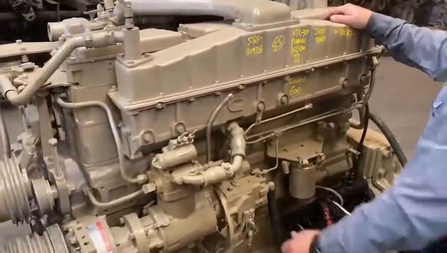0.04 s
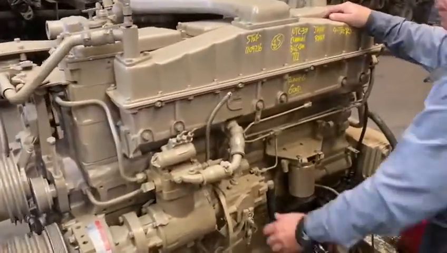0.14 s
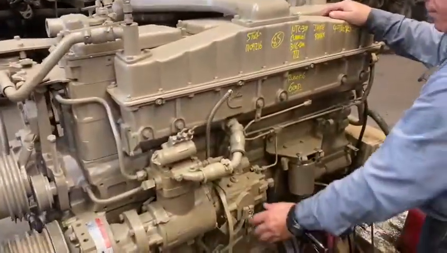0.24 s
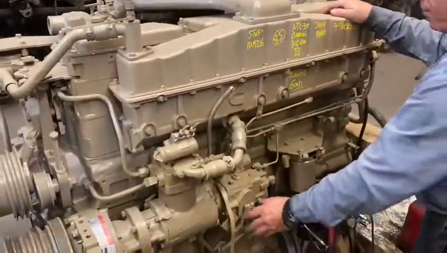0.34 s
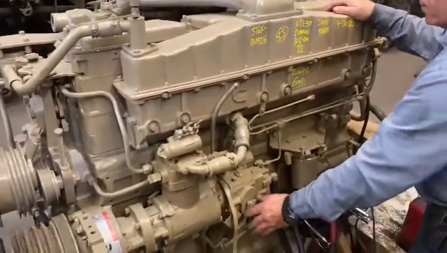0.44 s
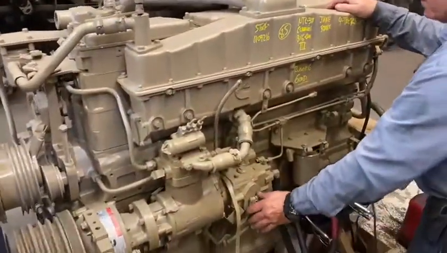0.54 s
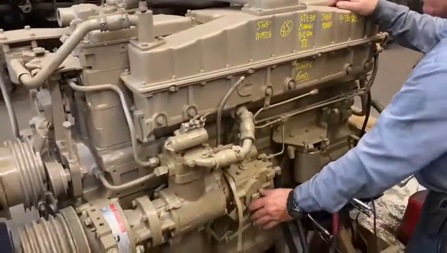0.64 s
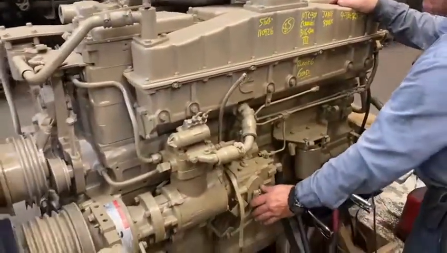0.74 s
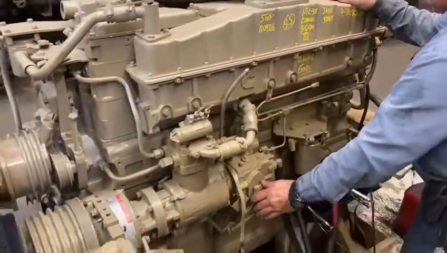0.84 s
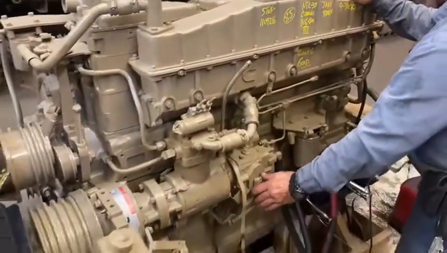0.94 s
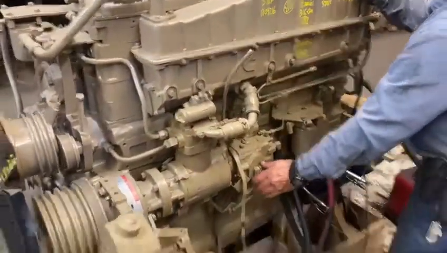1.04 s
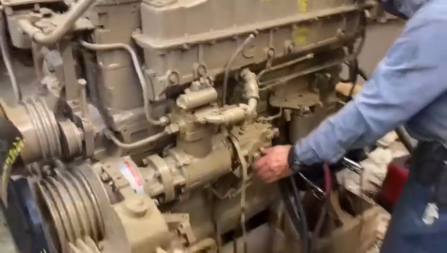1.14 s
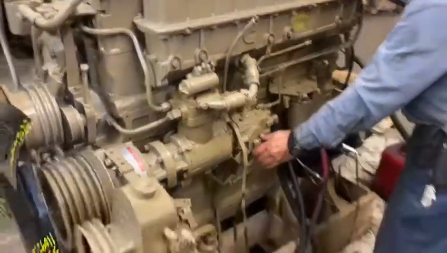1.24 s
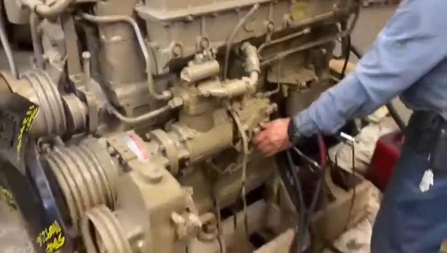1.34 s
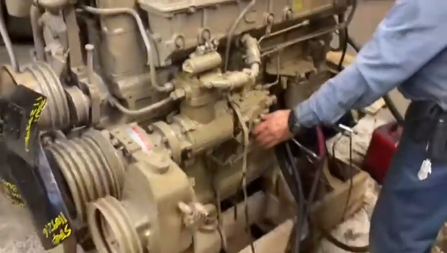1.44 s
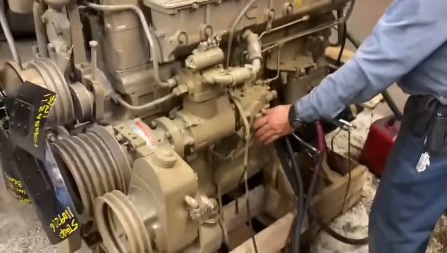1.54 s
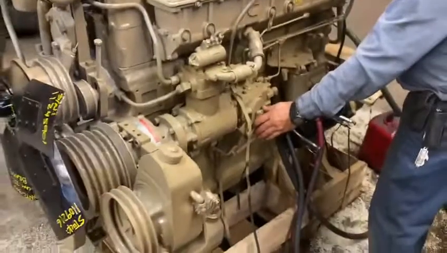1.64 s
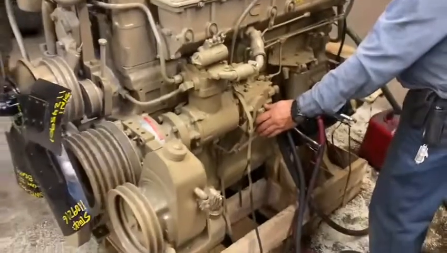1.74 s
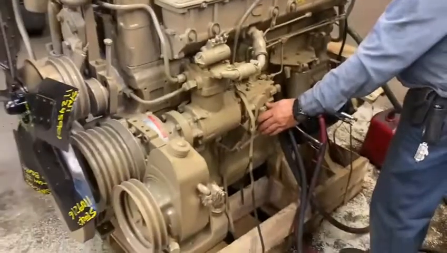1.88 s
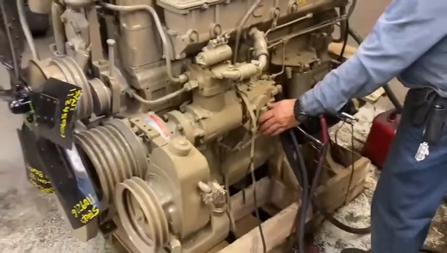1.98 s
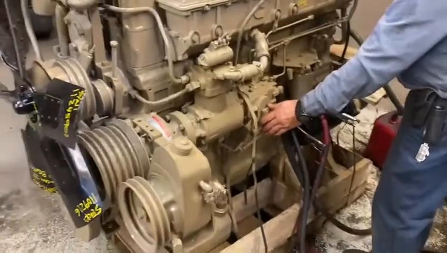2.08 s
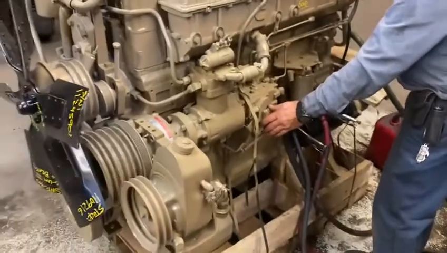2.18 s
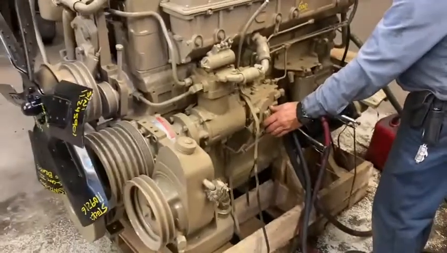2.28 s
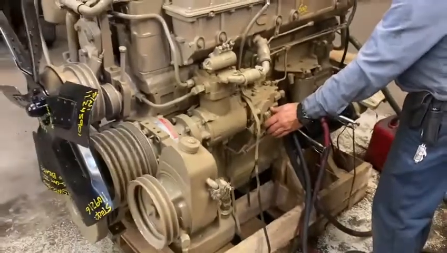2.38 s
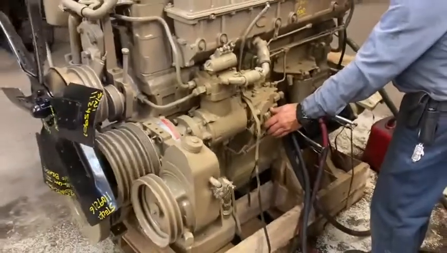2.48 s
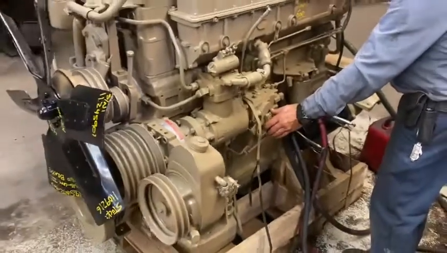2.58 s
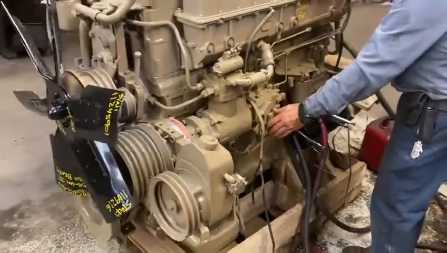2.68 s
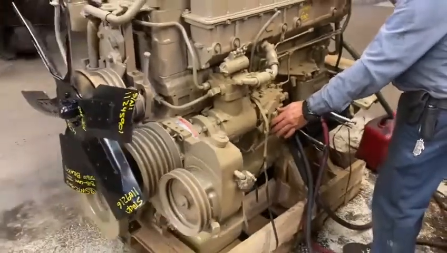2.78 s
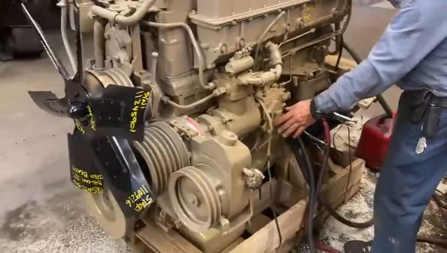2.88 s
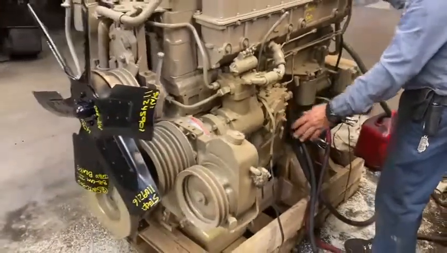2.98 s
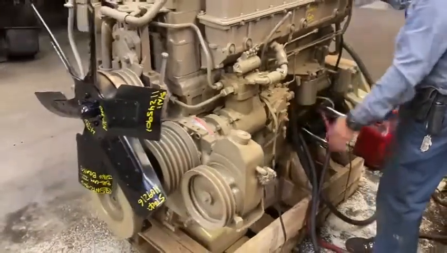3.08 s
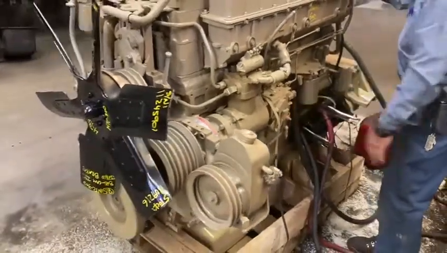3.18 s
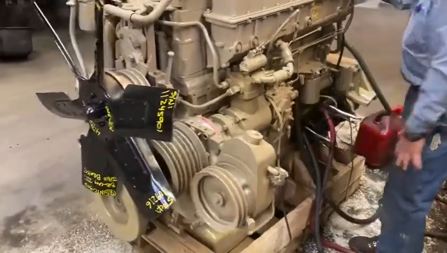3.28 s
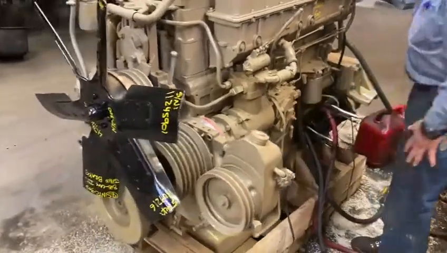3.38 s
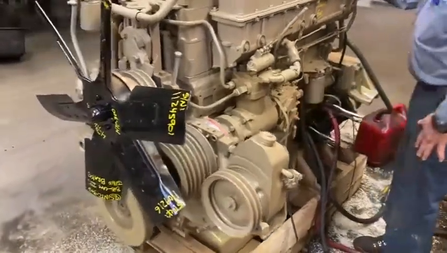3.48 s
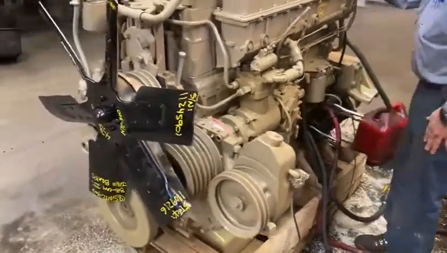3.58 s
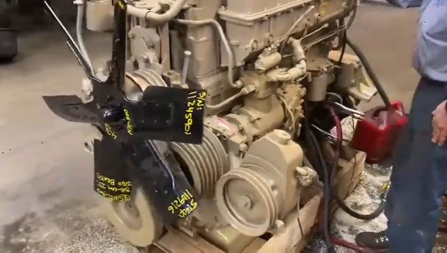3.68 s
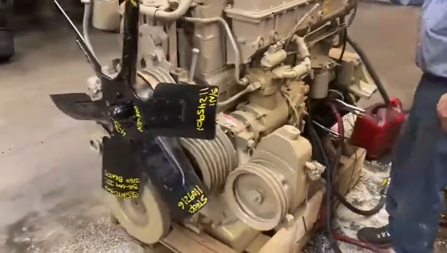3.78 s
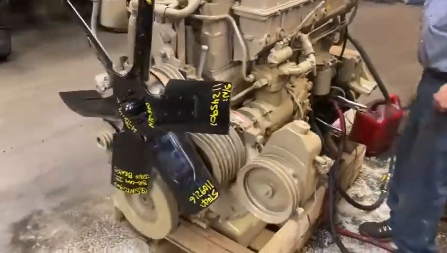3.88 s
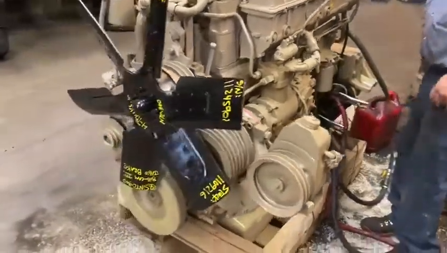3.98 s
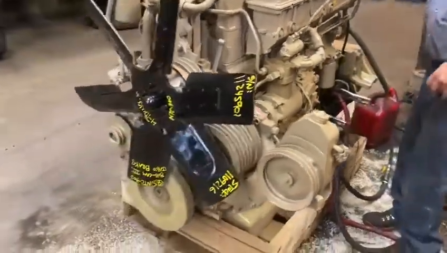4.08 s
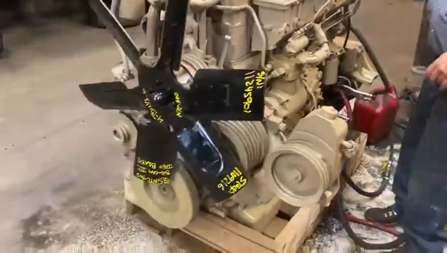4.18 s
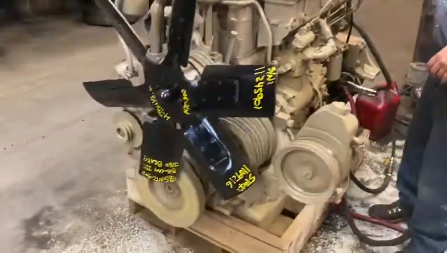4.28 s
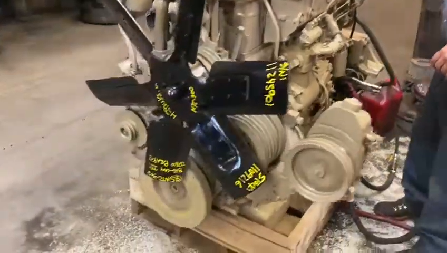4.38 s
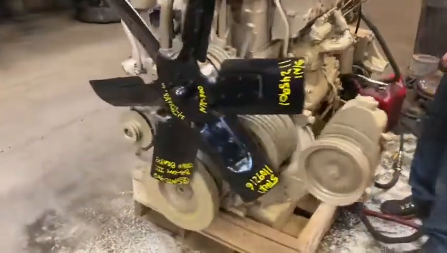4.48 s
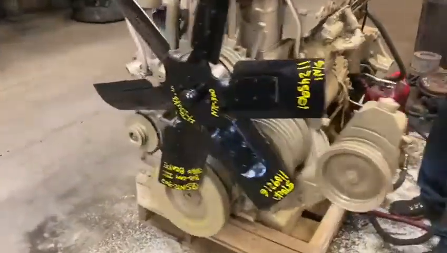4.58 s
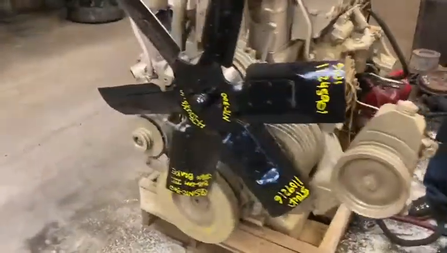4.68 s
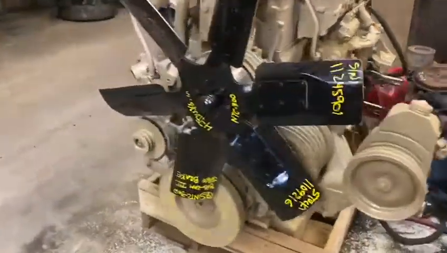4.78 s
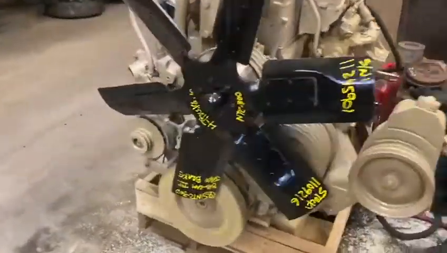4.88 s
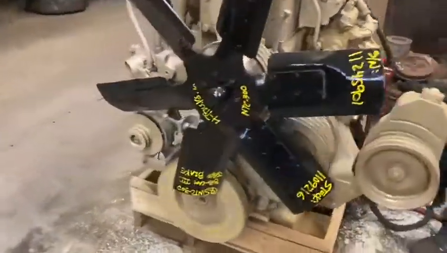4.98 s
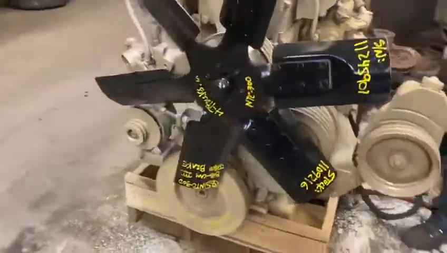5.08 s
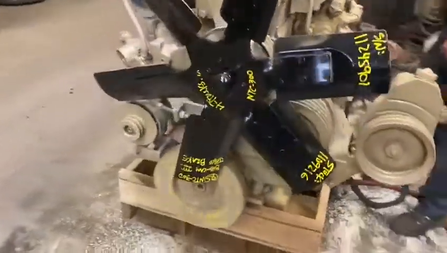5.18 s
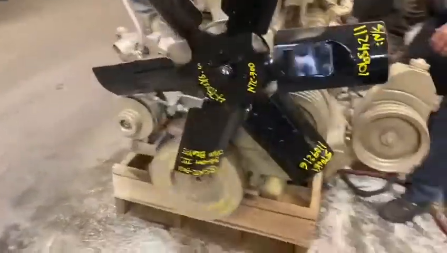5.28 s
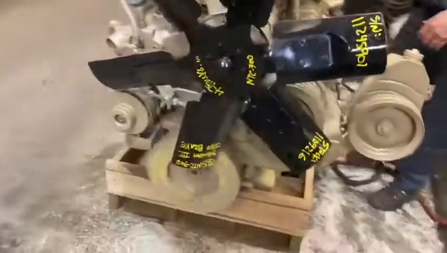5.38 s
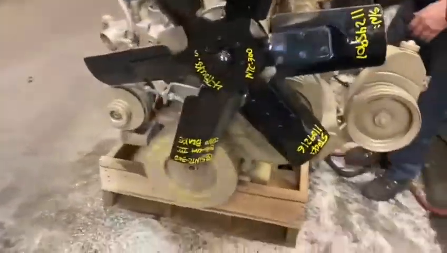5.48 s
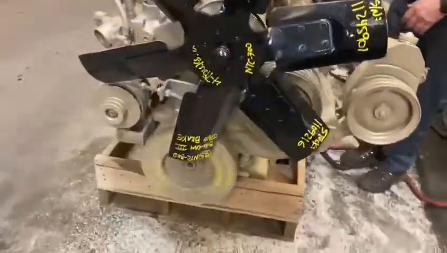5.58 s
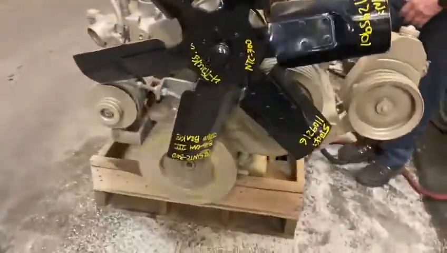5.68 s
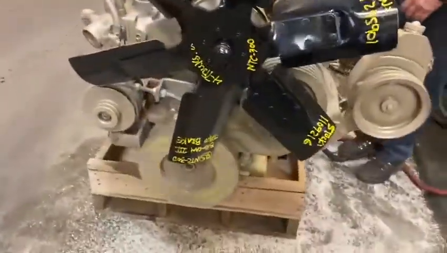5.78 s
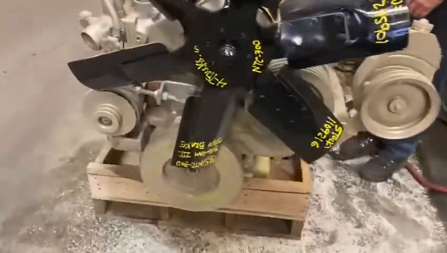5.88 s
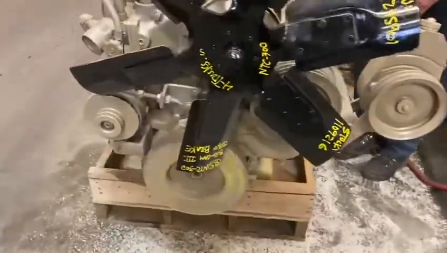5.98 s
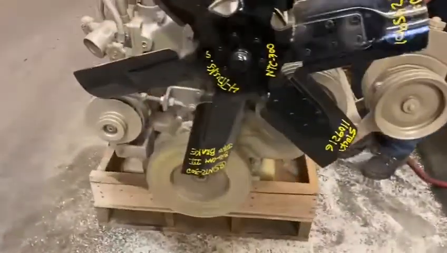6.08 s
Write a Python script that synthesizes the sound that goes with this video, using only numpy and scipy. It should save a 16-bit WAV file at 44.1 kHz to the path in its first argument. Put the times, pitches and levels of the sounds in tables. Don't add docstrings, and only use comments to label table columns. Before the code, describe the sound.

Large six-cylinder diesel clatters and puffs at idle, roars up in two blips as its turbo whistles, winds down nearly to stalling, then fires back up.

```python
import sys
import numpy as np
from scipy import signal
from scipy.fft import rfft, irfft, next_fast_len
from scipy.io import wavfile
from scipy.ndimage import uniform_filter1d, map_coordinates

SR = 44100
rng = np.random.default_rng(int(sys.argv[2]) if len(sys.argv) > 2 else 0)


def to_wav(s):
    ch = np.atleast_2d(s).T
    pcm = np.round(np.clip(ch, -1, 1) * 32767)
    wavfile.write(sys.argv[1], SR, pcm.astype(np.int16))


def linear_from_db(decibels):
    return 10 ** (np.asarray(decibels, float) / 20)


N = 270325
TIME_S = np.arange(N) / SR

# time_s, speed_turns_per_s
CRANK_SPEED = [(0.0, 11.16), (1.05, 11.19), (1.22, 12.06), (1.58, 17.57), (1.59, 19.76), (1.8, 20.56),
               (2.0, 20.46), (2.25, 19.87), (2.4, 21.0), (2.75, 27.49), (2.93, 29.06), (3.15, 28.36),
               (3.4, 26.09), (4.2, 17.97), (4.9, 11.88), (5.55, 7.27), (5.7, 7.91), (6.13, 13.74)]
# time_s, load_db, firing_pressure_db
ENGINE_LOAD = [(0.0, -26, -34), (1.15, -26.5, -36), (1.39, -18.5, -23), (1.6, -19, -24), (1.85, -21, -21),
               (2.1, -28, -29.5), (2.4, -22, -22.5), (2.72, -19.5, -17.5), (2.9, -23, -18),
               (3.1, -28, -26.5), (3.42, -27.5, -30), (3.55, -27, -45), (4.2, -32.5, -66),
               (4.85, -34.5, -54), (5.46, -38.5, -54), (5.72, -36.5, -41), (5.83, -31, -41),
               (6.13, -29.5, -44)]
# time_s, blade_hz, whine_db
TURBO_SPOOL = [(0.0, 1530, -35), (1.17, 1545, -34), (1.35, 1660, -26), (1.57, 1960, -33), (1.67, 2400, -45),
               (1.75, 2540, -27), (2.0, 2775, -34.5), (2.25, 2890, -33), (2.48, 3220, -28.5),
               (2.62, 3650, -27.5), (2.82, 4420, -29), (3.0, 4760, -32), (3.4, 4880, -32.5),
               (3.8, 4750, -35), (4.3, 4290, -38), (5.7, 2570, -41.5), (5.88, 2470, -31), (6.13, 2475, -28)]


def unit(x):
    return x / np.sqrt(np.mean(x ** 2) + 1e-20)


def along(points, hz):
    point_hz, value = np.transpose(points)
    return np.interp(np.log(hz + 1), np.log(point_hz + 1), value)


def curves(rows):
    time_s, *columns = np.transpose(rows)
    return [np.interp(TIME_S, time_s, column) for column in columns]


def wobble(rate_hz, count=1):
    at_knot = [np.arange(N) * rate_hz / SR]
    knots = int(N * rate_hz / SR) + 4
    return np.array([map_coordinates(rng.standard_normal(knots), at_knot) for _ in range(count)])


def filtered(x, response):
    size = next_fast_len(N + SR // 2)
    return irfft(rfft(x, size) * response(np.fft.rfftfreq(size, 1 / SR)), size)[..., :N]


def coloured(x, spectrum):
    return unit(filtered(x, lambda hz: linear_from_db(along(spectrum, hz))))


def noise():
    return rng.standard_normal((2, N))


def patchy(x, depth_db):
    z = signal.stft(x, nperseg=512)[2]
    field = uniform_filter1d(rng.standard_normal(z.shape[1:]), size=6, axis=0)
    field = uniform_filter1d(field, size=8, axis=1)
    return signal.istft(z * linear_from_db(depth_db * unit(field)), nperseg=512)[1][:, :N]


def gate(turns, count, at, width, scatter_db):
    beat = (turns - at) * count + .5
    size = linear_from_db(.7 * scatter_db * rng.standard_normal(1000))[beat.astype(int) % 1000]
    return size * np.exp(-.5 * ((beat % 1 - .5) / (width * count)) ** 2)


def crank():
    first_turn, change_s, skipped_turns = -.7835, 1.585, .4173
    return np.cumsum(curves(CRANK_SPEED)[0]) / SR + first_turn + skipped_turns * (TIME_S > change_s)


def acceleration(smooth_samples):
    return np.gradient(uniform_filter1d(curves(CRANK_SPEED)[0], size=smooth_samples)) * SR


def surge():
    return np.tanh(acceleration(6000) / 8)


def yard(x):
    # hz, t60_s
    decay = [(100, 0.39), (2000, 0.28), (10000, 0.18)]
    hz, t, z = signal.stft(rng.standard_normal((2, SR // 2)), SR, nperseg=256)
    tail = signal.istft(z * linear_from_db(-60 * t / along(decay, hz)[:, None]), SR, nperseg=256)[1]
    return signal.fftconvolve(x, tail / np.linalg.norm(tail[0]), axes=1)[:, :N]


def hum():
    return linear_from_db(-46) * np.sin(2 * np.pi * 60.0 * TIME_S)


def thump():
    return linear_from_db(-19) * np.exp(-.5 * ((TIME_S - 1.595) / .006) ** 2)


def turbo():
    blade_hz, whine_db = curves(TURBO_SPOOL)
    blade_hz = uniform_filter1d(blade_hz, size=6000)
    facing = np.clip((TIME_S - 5.58) / .1, 0, 1)
    spool = np.abs(np.gradient(blade_hz)) * SR / 4000
    angle = 2 * np.pi * np.cumsum(blade_hz + (8 + 100 * spool) * wobble(150)) / SR

    def flicker():
        shake = wobble(190, count=2) + 1j * wobble(190, count=2)
        return unit(1.1 + (1 - .4 * facing) * shake)

    octave_db = -20 + 8 * (blade_hz < 1700) + 9 * facing
    tone = flicker() * np.exp(1j * angle)
    tone = tone + linear_from_db(octave_db) * flicker() * np.exp(2j * angle)
    return linear_from_db(whine_db - 3 + wobble(14)[0]) * tone.real * [[1.1], [1.15]]


def air(turns):
    # time_s, level_db
    port_level = [(0, -21), (2.9, -23.5), (3.9, -27.5), (4.25, -31), (4.8, -33.5), (5.5, -45.5),
                  (6.13, -38)]
    # hz, level_db_per_hz
    puff_spectrum = [(300, -18), (700, -12.5), (1300, 3.5), (2200, -2), (3500, -0.5), (6000, -3.5),
                     (9000, -4), (11600, -9), (12300, -53)]
    # hz, level_db_per_hz
    hiss_spectrum = [(1200, -16), (2200, 1), (3000, 1), (4500, -0.5), (6500, -3.5), (9000, -5.5),
                     (11600, -9.5), (12300, -56)]
    puff_db, = curves(port_level)
    mean_load_db, follow, hiss_over_load_db = -27.5, 0.98, 1.5
    boost_db_per_octave, full_spool_hz = 6, 5120
    hiss_db = mean_load_db + follow * (curves(ENGINE_LOAD)[0] - mean_load_db) + hiss_over_load_db
    hiss_db += np.maximum(surge(), 0) * 16 / curves(CRANK_SPEED)[0]
    hiss_db += boost_db_per_octave * np.log2(curves(TURBO_SPOOL)[0] / full_spool_hz)

    puff = gate(turns, count=1, at=-0.013, width=0.09, scatter_db=1.4)
    puff += 0.16 * gate(turns, count=1, at=0.1, width=0.078, scatter_db=3.0)
    grain = linear_from_db(1.5 * wobble(700, count=2))
    flutter = 2.4 + 0.3 * gate(turns, count=3, at=0.06, width=.05, scatter_db=6.0)
    hiss = unit(patchy(coloured(grain * noise(), hiss_spectrum), depth_db=2.0))
    hiss = hiss * unit(flutter * linear_from_db(0.95 * wobble(25)))
    jet = unit(patchy(coloured(grain * noise(), puff_spectrum), depth_db=1.5))
    return linear_from_db(puff_db + 2.5) * puff * jet + linear_from_db(hiss_db - 3.5) * hiss


def knocks():
    # start_s, peak_db
    hard_firings = [
        (0.996, -15),
        (5.809, -25),
        (5.839, -15),
        (5.889, -26),
        (5.959, -23),
        (6.05, -29),
        (6.074, -9),
    ]
    out, t = np.zeros((2, N + 2000)), np.arange(2000) / SR
    ring = np.sin(2 * np.pi * 1620 * t) + 0.54 * np.sin(2 * np.pi * 720 * t)
    attack = 1 - np.exp(-t / 0.0017)
    for start_s, peak_db in hard_firings:
        start = round(start_s * SR)
        out[:, start:start + len(t)] += linear_from_db(peak_db - 5.5 - 60 * t / 0.046) * attack * ring
    return out[:, :N]


def block(turns):
    # centre_hz, width_hz, level_db
    resonances = [(532, 56, 1), (699, 91, 4), (936, 363, -1.5), (1396, 640, -3.5), (1615, 116, 2),
                  (1960, 320, -12.5), (3096, 144, -0.5)]
    fuel = np.clip(acceleration(4000) / 15, 0, 1)
    combustion = gate(turns, count=3, at=0.074, width=0.024, scatter_db=3.0)
    valves = gate(turns, count=1, at=0.341, width=0.054, scatter_db=-7.5)
    strike = 1.8 + (.5 + 0.96 * fuel) * combustion + 0.67 * valves
    ticks = (rng.random((2, N)) < .006) * rng.standard_normal((2, N))

    def casting(hz):
        total = 0
        for k, (centre, width, db) in enumerate(resonances):
            skirt = 1j * hz * width
            total = total + (-1) ** k * linear_from_db(db) * skirt / (centre * centre - hz * hz + skirt)
        return total / (1 + (hz / 2400) ** 6 + (400 / (hz + 1)) ** 6)

    roar = patchy(filtered(strike * (noise() + 5.2 * ticks), casting), depth_db=1.0)
    return linear_from_db(curves(ENGINE_LOAD)[0] + 0.13) * unit(roar)


def exhaust(turns):
    # hz, level_db_per_hz
    pipe_spectrum = [(110, -54), (150, -3.5), (180, -13.5), (207, 2), (232, -2.5), (260, 1), (310, 0.5),
                     (365, 0.5), (420, -2), (500, -4), (700, -20.5), (1000, -43.5)]
    # hz, level_db_per_hz
    rumble_spectrum = [(20, -30), (35, -8), (55, -2), (90, 3.5), (140, -1.5), (190, -0.5), (260, -60)]
    speed = curves(CRANK_SPEED)[0]
    pipe_db, rumble_db = curves(ENGINE_LOAD)[0] + [[-3], [1.5]] + 2.5 * wobble(4.925, count=2)
    pipe_db = pipe_db + 0.73 * (TIME_S - 2)
    pipe_db += -0.5 * np.log2(speed / 16)
    pipe_db += 4 * np.maximum(surge(), 0) * (speed / 28) ** 3 - 1.5

    firing = np.floor(3 * turns).astype(int)
    cylinder = linear_from_db([7.5, -26.0, 0.0, -8.0, 3.5, -23.5])[firing % 6]
    pulses = np.diff(firing, prepend=firing[0]) * cylinder * linear_from_db(2.5 * wobble(60)[0])
    gas = noise() * (3.4 + gate(turns, count=3, at=0.08, width=0.07, scatter_db=4.))
    pipe = 0.33 * coloured(pulses, pipe_spectrum) + 1.037 * coloured(gas, pipe_spectrum)
    return linear_from_db(pipe_db) * pipe + linear_from_db(rumble_db - 10.5) * coloured(noise(), rumble_spectrum)


def orders(turns):
    # hz, gain_db
    stack = [(33, -8.5), (55, 3.5), (70, -7), (98, 0.5), (125, -7.5), (158, -7), (178, -24), (207, -5)]
    pumping_db = [-89, -50, -54.5]
    idle_db, follow, uneven_db = [-34, -38, -34], [1, 1.15, .2], [1.2, 2.5, 6]
    speed = curves(CRANK_SPEED)[0]
    rise_db = curves(ENGINE_LOAD)[1] - idle_db[0]
    sharp_db = 2.5 * surge()
    lines = 0
    for k, motored_db in enumerate(pumping_db):
        order = 3 * (k + 1)
        fired_db = idle_db[k] + np.where(rise_db > 0, follow[k], 1) * rise_db
        fired_db = fired_db + along(stack, order * speed) + k * sharp_db
        waver_db = -2 + uneven_db[k] * speed / speed.max() * wobble(14)[0]
        level = (linear_from_db(fired_db) + linear_from_db(motored_db)) * linear_from_db(waver_db)
        lines = lines + level * np.sin(2 * np.pi * order * turns + k)
    return np.sqrt(2) * lines


def ports(pair):
    # hz, correlation
    likeness = [(100, 0.89), (400, 1), (800, 0.74), (1550, 0.16), (2250, 0.61), (3000, 0.28), (4200, 0.41),
                (5300, 0.29), (6500, 0.61), (7400, 0.07), (8200, 0.9), (9100, 0.66), (10000, 0.93),
                (12000, 0.75)]
    # hz, lead_rad
    left_lead = [(50, 0), (900, .8), (1600, -.3), (2250, 0), (3000, 1), (4000, .2), (5000, .8), (6500, 0),
                 (7200, -.6), (8000, -3), (8800, -3.3), (9600, -6.2), (10800, -6.4), (11300, -9.4)]
    # hz, difference_db
    left_lean = [(60, -2.0), (140, -2), (350, -3.0), (840, -2.5), (2020, 0.5), (4870, 0.5), (11700, 0.5)]

    def spread(hz):
        turn = np.arccos(np.clip(along(likeness, hz), -1, 1)) / 2
        return np.array([np.cos(turn), np.sin(turn)])

    def split(hz):
        half = linear_from_db(along(left_lean, hz) / 2) * np.exp(.5j * along(left_lead, hz))
        return np.array([half, 1 / half])

    mid, side = filtered(pair, spread)
    return filtered(np.array([mid + side, mid - side]), split)


def scene():
    turns = crank()
    engine = exhaust(turns) + block(turns) + knocks() + air(turns) + turbo()
    pressure = (orders(turns) + hum() + thump()) * [[1.4], [.1]]
    return ports(pressure + engine + linear_from_db(-10.5) * yard(engine))


def thrifty(x, from_hz, mid_db, side_db, top_hz, faint_db, jump_db):
    hz, _, z = signal.stft([x[0] + x[1], x[0] - x[1]], SR, nperseg=1536)
    bands = (np.abs(z[:, :768]) ** 2).reshape(2, 64, 12, -1).mean(axis=2)
    power = np.pad(np.repeat(bands, 12, axis=1), ((0, 0), (0, 1), (0, 0)))
    hz = hz[:, None]
    weaker = power < linear_from_db([[[-2 * mid_db]], [[-2 * side_db]]]) * power[::-1]
    masked = weaker & (hz > from_hz * np.array([[[3.5]], [[1]]]))
    faint = (power < linear_from_db(2 * faint_db) * power.mean(axis=(0, 1))) & (hz > top_hz)
    treble = (power * (hz > top_hz / 2)).sum(axis=(0, 1))
    steady = treble < linear_from_db(2 * jump_db) * np.roll(treble, 1)
    mid, side = signal.istft(z * ~((masked | faint) & steady), SR, nperseg=1536)[1][:, :N]
    return np.array([mid + side, mid - side]) / 2


def low_pass(x):
    return signal.sosfilt(signal.butter(12, 12330, fs=SR, output="sos"), x)


def record(dry):
    soft = dry / (1 + np.abs(dry / .99) ** 6) ** (1 / 6)
    mix = thrifty(soft, from_hz=2000., mid_db=5., side_db=4., top_hz=10900., faint_db=-17., jump_db=8.)
    return low_pass(mix)


dry = scene()
out = record(dry)
to_wav(out)
```